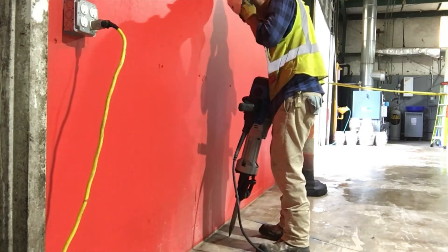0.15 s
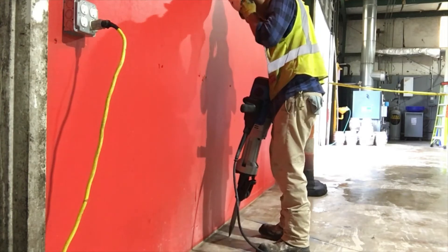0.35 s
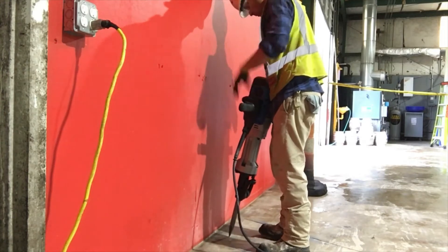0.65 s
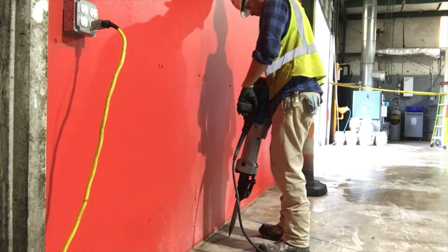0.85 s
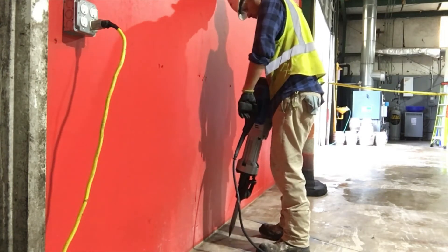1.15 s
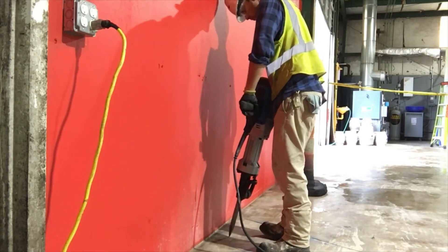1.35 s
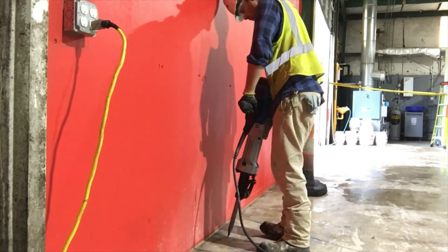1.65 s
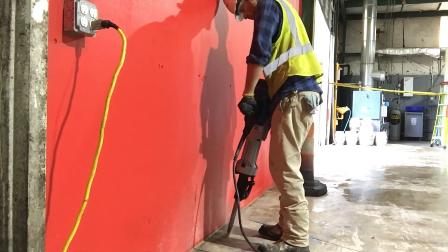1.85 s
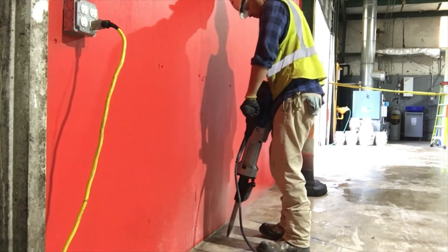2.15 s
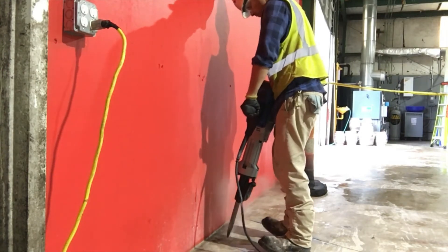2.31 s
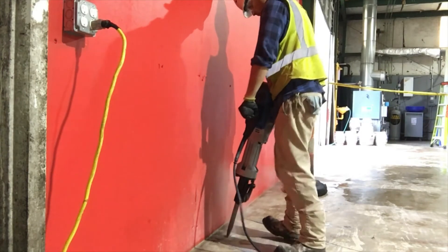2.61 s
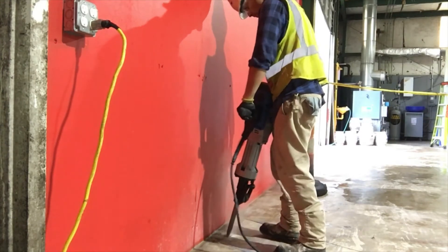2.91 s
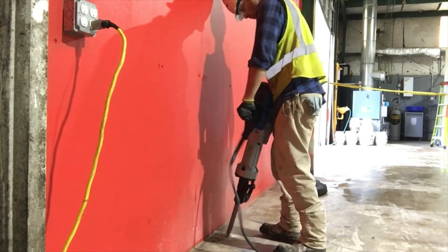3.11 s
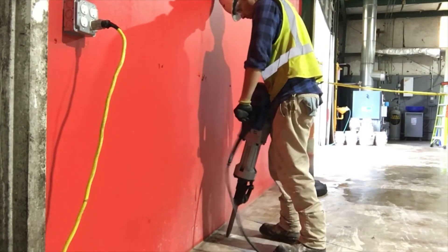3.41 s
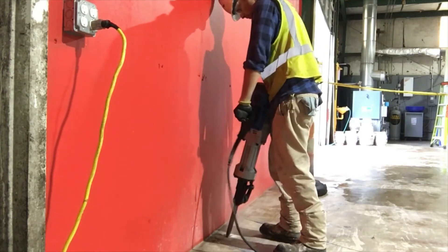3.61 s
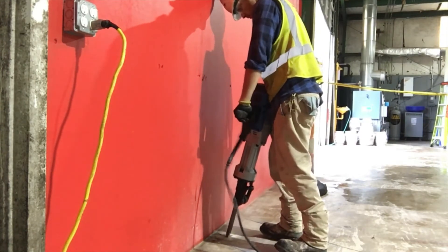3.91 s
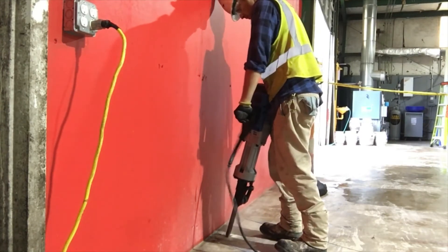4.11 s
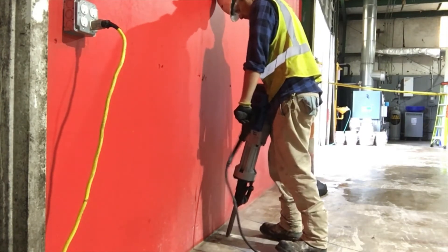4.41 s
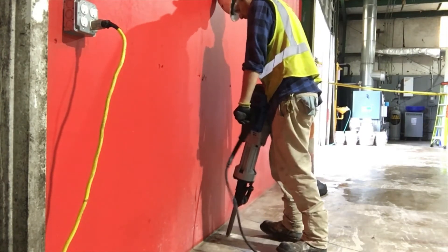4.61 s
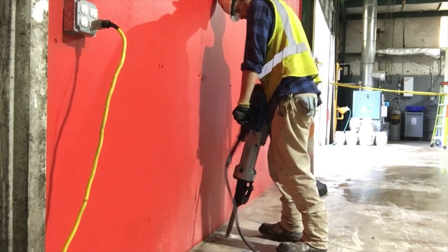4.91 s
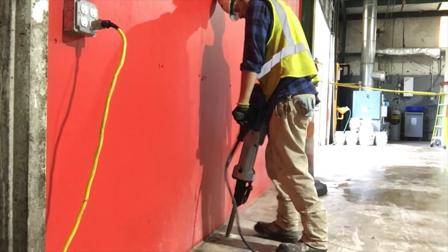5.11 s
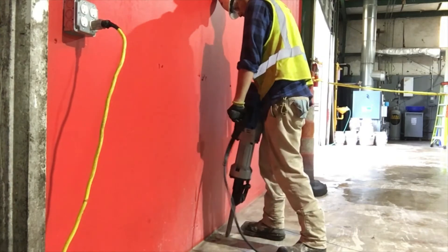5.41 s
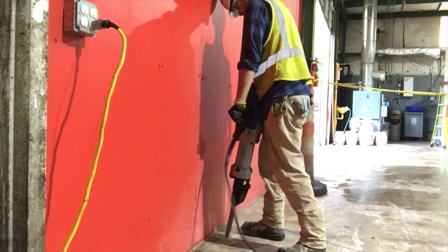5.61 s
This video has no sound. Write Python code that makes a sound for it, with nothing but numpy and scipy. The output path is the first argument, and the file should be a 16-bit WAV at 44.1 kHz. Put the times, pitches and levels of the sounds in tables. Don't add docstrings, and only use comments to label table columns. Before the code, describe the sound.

After a quiet ventilation drone, a motor whirs up and a steel chisel hammers concrete in loud, sharp, ringing blows about fifteen a second.

```python
import sys
import numpy as np
from scipy import signal
from scipy.fft import rfft, irfft, next_fast_len
from scipy.io import wavfile
from scipy.ndimage import uniform_filter1d, map_coordinates

SR = 44100
rng = np.random.default_rng(int(sys.argv[2]) if len(sys.argv) > 2 else 0)


def makeup_ratio(level_db):
    decades = np.asarray(level_db, float) / 20
    return 10 ** decades


def file_out(sig):
    cols = np.atleast_2d(sig).T
    lim = np.clip(cols, -1, 1)
    pcm = np.round(lim * 32767).astype(np.int16)
    wavfile.write(sys.argv[1], SR, pcm)


N = 253575

# delay [ms], pitch [Hz], half length [ms], level [dB]
STROKE = [
    (-1.6, 410, 1.8, 0),
    (1.4, 200, 2.2, -9),
    (-4.2, 1900, .6, -9),
    (-3.2, 800, .9, -8),
    (.45, 1250, .6, -6),
    (5.4, 1220, 1.2, -9),
    (7.3, 850, 2, -12),
    (21.5, 2000, .6, -9),
    (26.1, 1900, .6, -10),
]
# pitch [Hz], level [dB], t60 [s]
HOUSING = [(144.7, -22.5, 0.36), (208.8, -9.5, 0.073), (280, -40, 0.016), (581, -18, 0.1),
           (766.6, -6, 0.044), (851, -11, 0.055), (1067, -25, 0.035), (3235, -12.5, 0.068),
           (5580, -15, 0.024)]
# start [s], chisel ring [dB], free bounce [ms], twin against main ring [dB]
RINGING_BLOWS = [(1.6246, -11, 35, 0.5), (1.7128, -8.5, 39, -3), (1.7913, -11, 21, 0), (1.866, -11.5, 22.4, -5),
                 (1.9434, -8, 16, -2), (2.0139, -17.5, 22, 3.5), (2.088, -13, 41, -2), (2.1557, -7.5, 29, -18),
                 (2.2239, -18, 61, 5), (2.2923, -17, 65, 2), (2.3575, -18, 36, 6), (2.425, -10.5, 31, 2.5),
                 (2.4909, -19.5, 36, 3), (2.5585, -22.5, 34, 0), (2.6242, -23, 16.4, 2), (2.6899, -24.5, 30, 6.5),
                 (2.755, -20.5, 28, 3.5), (2.8189, -14, 19.4, -1), (2.884, -19.5, 40, -1), (2.9505, -26, 25, 1),
                 (3.0152, -17.5, 31, -3), (3.0812, -12, 26, -3.5), (3.1464, -18, 31, -1.5), (3.2114, -26, 19, -8),
                 (3.2776, -18, 34, -3), (3.342, -10, 28.5, -30), (3.4061, -26, 58, -18), (3.474, -18, 18, -8),
                 (3.538, -18.5, 30, -7), (3.6009, -14.5, 29, -10),
                 (3.665, -36, 22, -7), (3.729, -16.5, 28, -12), (3.7925, -26, 44, 2.5), (3.858, -20, 28, -9),
          (3.9212, -11.5, 34, -8), (3.9856, -16, 30, -3), (4.1157, -19, 27, 3), (4.18, -17.5, 29, -22),
          (4.2441, -24, 29, -2), (4.3083, -28, 10, -2), (4.3723, -26.5, 26, 2), (4.4996, -20.5, 22, 2),
          (4.5627, -23.5, 29, -8), (4.689, -13, 21.5, -15), (4.7534, -26, 44, -6), (4.8182, -20.5, 23, -2),
          (4.8823, -29, 50, -3), (4.9473, -24.5, 22, 1), (5.0105, -23, 25, -7), (5.0742, -22.5, 30, 2),
          (5.1371, -29, 42, 2), (5.203, -21, 26, 0.5), (5.2666, -16, 26, -5), (5.33, -22.5, 31, -1),
          (5.396, -13, 26.5, 2), (5.5236, -14, 30, -9), (5.5886, -17.5, 35, -7), (5.72, -25, 32, 0)]
DEAD_S = [4.0499, 4.4362, 4.6265, 5.4581, 5.653]
DEAD_RING = (-43, 47, -2)
GLANCING_S, GLANCING_DB = [2.088, 2.5585, 3.729, 5.0742], -6.5
# pitch [Hz], level [dB]
CRACK_COLOUR = [(300, -28), (1200, -6), (2000, -11.5), (3300, 2), (4200, -3.5), (5200, -1.5), (6200, -6.5),
                (7500, -1.5), (10000, -22.5), (14000, -8), (16000, -26)]
# pitch [Hz], level [dB], share of the gain swing
PINGS = [(1443, -30, 0.37), (2020, -15.5, 1.5), (3210, -34, .4), (1400, -27.5, 0.82)]
# start [s], pitch [Hz], level [dB]
LOUD_PINGS = [(1.6246, 1440, -20), (1.7913, 2095, -14.5), (1.866, 2100, -19), (1.9434, 2040, -17.5),
              (2.2923, 1450, -14.5), (2.5585, 3080, -21.5), (3.7925, 5560, -35), (4.2441, 3790, -19),
              (4.6263, 3560, -11.5), (5.203, 1395, -18), (5.2666, 1980, -17)]
# pitch [Hz], level [dB]
CHISEL = [
    [(7046, -1.5), (7120, -11.5), (7200, -17), (7270, -18)],
    [(6780, -4.5), (6835, -7.5)],
    [(4445, 1), (4640, 0.5)],
    [(9300, -3), (9610, -5.5), (12100, -7.5), (12400, -37)],
    [(13785, -1), (15300, -14), (15600, -19)],
]
# start [s], level [dB]
SQUARE = [(1.6246, 0.5), (1.7128, -4), (2.088, 2), (2.2239, -2), (2.755, 3), (2.6242, 4), (2.6899, 7),
          (3.0812, 6), (3.9212, 6), (3.9856, 3.5), (4.689, 9), (5.396, 7), (3.342, 0.5), (4.1157, 6),
          (2.8189, -0.5), (3.0152, -6), (3.474, -12), (3.538, -4), (3.6009, -0.5), (5.2666, -1),
          (5.5886, -15)]
# start [s], level [dB]
MUFFLE = [
    (2.75, -10),
    (2.82, -14.5),
    (5.7, -17.5),
]
CHOKED_S, CHOKED_DB = [1.6246, 1.866, 2.425, 2.5585, 2.6242], -7.5
# start [s], tooth rate [Hz]
GEARS = [
    (1.458, 602),
    (1.55, 986),
    (1.61, 1332),
    (1.7, 1490),
    (2.0, 1746),
    (2.2, 1900),
    (3.2, 1935),
    (5.75, 1922),
]
# pitch [Hz], level [dB]
TEETH = [(900, -12), (1500, -9), (1950, -3), (2900, 3), (3900, -2), (5800, -1), (8000, -20)]
# start [s], level [dB]
START = [
    (1.455, -31),
    (1.463, -17),
    (1.595, -18),
    (1.605, -12),
    (1.683, -33),
    (1.703, -24),
    (1.72, -26),
]
# pitch [Hz], width [Hz], level [dB]
GEARBOX = [(670, 51, 0), (1300, 200, -2.5), (1900, 310, 2), (2604, 76, 6.5), (2990, 91, 0),
           (4000, 640, -3.5), (5470, 1900, -13)]
# pitch [Hz], level [dB]
RUSH = [(60, -46), (150, -7.5), (600, -6.5), (1200, -1.5), (1950, -3.5), (2430, -4), (5780, -12),
        (6300, -26), (7020, -0.5), (8900, -29), (14000, -73), (16000, -28)]
# pitch [Hz], level [dB per Hz]
HALL = [(30, -23), (50, -17), (65, -3.5), (127, -14), (357, -13), (499, -17), (718, -15), (1030, -21),
        (1530, -19), (4940, -23.5), (6180, -19.5), (7950, -29.5), (11400, -32.5), (16000, -38.5)]
# pitch [Hz], width [Hz], level [dB]
HUM = [(57, 7.3, -11.5), (103.4, 13, -31), (235.4, 37, -15), (658, 6.7, -13)]
# pitch [Hz], t60 [s]
REVERB = [(100, 0.34), (1000, 0.36), (5000, 2), (15000, 2.7)]
# start [s], level [dB]
GAIN = [(1.5, -3.5), (1.8, -7.5), (2.3, -9.5), (3, -9), (3.6, -5.5), (4.2, -3), (4.6, -0.5), (5.3, -0.15),
        (5.75, -1)]
STARVED = [1.470, 1.752, 2.429, 2.562, 2.736, 3.437, 3.737, 4.201, 4.908, 5.079, 5.165]
# pitch [Hz], level under the loudest partial [dB]
MASK = [(7900, -120), (8100, -41), (8950, -41), (9200, -58), (10500, -49), (11200, -58), (14100, -58),
        (14500, -47)]

THUMP_DB, THUMP_FOLLOWS = -7.5, 0.59
GLANCING_THUMP_DB, REBOUND_GROWS_DB_PER_S = -2.5, 1.44
CRACK_DB, CRACK_FRESH_DB, CRACK_SETTLE_S, CRACK_SCATTER_DB = -9.5, 8.5, 0.21, 1.9
SNAP = 0.48
LANDING_DB, LANDING_T60_S = -14, 0.0081
CHATTER_DB, CHATTER_HZ = -34, 7000
PING_SCATTER_DB = 3.5
FAMILY_DB, FAMILY_LAG, FAMILY_SCATTER_DB, TYPICAL_RING_DB = [-16, -20, -17], [0.35, 0.15, 0.18], 2.5, -19
MUFFLE_SCATTER_DB = 2.5
SIDE_CHOKE = 1.4
SWITCH_S, SPIN_UP_END_S = 1.458, 1.73
WHINE_DB, WHINE_FOLLOWS, SPIN_UP_DB = -23, 0.97, 9
SPIN_UP_DULL_DB = -5
RUSH_DB, RUSH_FOLLOWS, RUSH_RISE_S = -22.5, 1.12, 0.26
HALL_DB, HALL_FOLLOWS = -35.5, 1.04
FAN_HZ, FAN_DB = 65.1, -3
TOP_HZ = 15900


def thump():
    track = np.zeros(N)
    t = np.arange(SR // 10) / SR
    u = t - .007
    times, *_, gain_db = blows()
    thump_db = THUMP_DB + THUMP_FOLLOWS * gain_db + 1.2 * rng.standard_normal(len(times))
    thump_db[nearest(GLANCING_S[1:])] += GLANCING_THUMP_DB
    for s, db in zip(times, thump_db):
        swings = 0
        for ms, hz, half_ms, level in STROKE:
            v = u - ms / 1000
            swing_db = level + rng.normal(0, 1)
            if 4 < ms < 10:
                swing_db += REBOUND_GROWS_DB_PER_S * (s - 3.5)
            swings = swings + makeup_ratio(swing_db) * np.exp(-(1000 * v / half_ms) ** 2) * -np.cos(2 * np.pi * hz * v)
        ring = 0
        for hz, level, t60 in HOUSING:
            ring = ring + makeup_ratio(level + rng.normal(0, 1.85) - 60 * abs(u) / t60) * np.sin(2 * np.pi * hz * u)
        add(track, s - .007, makeup_ratio(db) * (swings - (u > 0) * ring))
    return filtered(track, lambda hz: (1j * hz / (90 + 1j * hz)) ** 2)


def crack():
    burst, pings, chatter = np.zeros(N), np.zeros(N), np.zeros(N)
    t = np.arange(SR // 16) / SR
    rise = 1 - np.exp(-(t / 0.0019) ** 2)
    times, _, bounces, _, gain_db = blows()
    luck = rng.standard_normal((len(times), 3))
    fresh_db = CRACK_FRESH_DB * np.exp((times[0] - times) / CRACK_SETTLE_S)
    crack_db = CRACK_DB + fresh_db + CRACK_SCATTER_DB * luck[:, 0]
    crack_db[nearest(GLANCING_S)] += GLANCING_DB

    base_hz, base_db, follows = np.array(PINGS)[rng.integers(len(PINGS), size=len(times))].T
    part_hz = base_hz * (1 + .03 * luck[:, 1])
    part_db = base_db + follows * gain_db + PING_SCATTER_DB * luck[:, 2]
    loud_s, loud_hz, loud_db = np.transpose(LOUD_PINGS)
    part_hz[nearest(loud_s)] = loud_hz
    part_db[nearest(loud_s)] = loud_db

    for s, db, bounce_ms, hz, ping_db in zip(times, crack_db, bounces, part_hz, part_db):
        free_s = bounce_ms / 1000
        decay = SNAP * makeup_ratio(-60 * abs(t - .002) / 0.0054) + makeup_ratio(-60 * t / 0.023) + 0.16 * makeup_ratio(-60 * t / 0.12)
        add(burst, s - .001, makeup_ratio(db + 7.5) * decay * rng.standard_normal(len(t)) * rise)
        tick_db = db + 4.5 + LANDING_DB + rng.normal(0, 3)
        tick = makeup_ratio(tick_db - 60 * t / LANDING_T60_S) * rng.standard_normal(len(t))
        add(burst, min(s + free_s, N / SR), tick * rise)
        grit_size = makeup_ratio(db + CHATTER_DB + rng.normal(0, 6))
        add(chatter, s, grit_size * (t < free_s) * rng.standard_normal(len(t)))
        add(pings, s, makeup_ratio(ping_db + 5.5 - 60 * t / 0.049) * np.sin(2 * np.pi * hz * t) * rise)
    coloured = filtered(burst, lambda hz: makeup_ratio(along(CRACK_COLOUR, hz)))
    bright = filtered(chatter, lambda hz: (1j * hz / (CHATTER_HZ + 1j * hz)) ** 2)
    return coloured + pings + bright


def chisel():
    track = np.zeros(N)
    t = np.arange(SR // 10) / SR
    times = blows()[0]
    choke = np.interp(times, *np.transpose(MUFFLE))
    choke[nearest(CHOKED_S)] += CHOKED_DB
    side = np.zeros(len(times))
    square_s, square_db = np.transpose(SQUARE)
    side[nearest(square_s)] = square_db
    for s, db, bounce_ms, twin_db, _, side_db, choke_db in zip(*blows(), side, choke):
        luck = rng.standard_normal(4)
        muffle_db = choke_db + MUFFLE_SCATTER_DB * luck[0]
        lag_db = np.multiply(FAMILY_LAG, db - TYPICAL_RING_DB)
        sides_db = side_db + np.array(FAMILY_DB) - lag_db + FAMILY_SCATTER_DB * luck[1:]
        landed = 1 / (1 + np.exp(-(t - bounce_ms / 1000) / 0.00025))
        fade_db = -60 * t / .5 - 60 * np.maximum(t - .055, 0) / 0.14
        shape = makeup_ratio(db + 5.0 + fade_db + muffle_db * landed) * (1 - np.exp(-t / 0.0027))
        for modes, share_db in zip(CHISEL, (0, twin_db, *sides_db)):
            for k, (hz, level) in enumerate(modes):
                spread = rng.standard_normal(3)
                lesser = min(k, 1)
                waver = np.interp(t, np.linspace(0, t[-1], num=13), rng.standard_normal(size=13))
                slip = (.5 + .6 * lesser) * waver * (1 + abs(np.log(hz / 7000)))
                strength = makeup_ratio(lesser * 4.5 * spread[2] + (1.5 + 2 * lesser) * waver[::-1])
                tone = np.sin(2 * np.pi * hz * (1 + 0.0011 * spread[0]) * t + 3 * spread[1] + slip)
                extra_db = (abs(hz - 7000) > 1000) * (SIDE_CHOKE - 1) * muffle_db * landed
                add(track, s, shape * makeup_ratio(share_db + level + extra_db) * strength * tone)
    return track


def motor():
    until, since = crank()
    tooth_hz = curves(GEARS)[0]
    gain_db = curves(GAIN)[0]
    running = np.arange(N) / SR - SWITCH_S
    spinning_up = running < SPIN_UP_END_S - SWITCH_S

    load = makeup_ratio(2.5 * wobble(15)) * np.exp(-((until - .012 - .002 * wobble(15)) / .0055) ** 2)
    sag = (.034 + .01 * wobble(15) - .018 * spinning_up) * np.tanh((until - .012) / 0.0054)
    turn = 2 * np.pi * np.cumsum(tooth_hz * (1 + sag + .015 * wobble(70))) / SR
    whine = 0
    for k in range(1, 5):
        share = makeup_ratio(along(TEETH, k * tooth_hz) + 2.5 * wobble(120)) * (load + .7 / k ** 2)
        whine = whine + share * makeup_ratio(spinning_up * SPIN_UP_DULL_DB * abs(k - 2)) * np.sin(k * turn)
    whine_db = WHINE_DB + np.where(spinning_up, SPIN_UP_DB, WHINE_FOLLOWS * gain_db)

    rush_size = makeup_ratio(RUSH_DB + RUSH_FOLLOWS * gain_db) * np.clip(running / RUSH_RISE_S, 0, 1)
    flare = 1 + .8 * np.exp(-since / .012)
    rush = rush_size * makeup_ratio(-1 + 1.94 * wobble(40) + 0.67 * wobble(7.3)) * flare * noise(RUSH)

    knocks = rng.standard_normal(N) * makeup_ratio(3.1 * wobble(400))
    clatter_db = curves(START + [(1.76, -45)], before=-120)[0] - 2.5
    clatter = makeup_ratio(clatter_db) * unit(filtered(knocks, resonant(GEARBOX)))
    t = np.arange(SR // 20) / SR
    clack = makeup_ratio(-13 - 60 * t / 0.078) * np.sin(2 * np.pi * 1450 * t) * (1 - np.exp(-t / .0015))
    add(clatter, 1.461, clack)
    return (running > 0) * makeup_ratio(whine_db) * whine + rush + clatter


def crank():
    t = np.arange(N) / SR
    hits = np.r_[-1, 1.563, blows()[0], 5.785]
    after = np.searchsorted(hits, t)
    return hits[after] - t, t - hits[after - 1]


def blows():
    rows = np.array(sorted(RINGING_BLOWS + [(s, *DEAD_RING) for s in DEAD_S]))
    return (*rows.T, np.interp(rows[:, 0], *np.transpose(GAIN)))


def nearest(times):
    return abs(blows()[0][:, None] - times).argmin(axis=0)


def reverb(x):
    hz, t, z = signal.stft(rng.standard_normal(SR), SR, nperseg=256)
    tail = signal.istft(z * makeup_ratio(-60 * t / along(REVERB, hz)[:, None]), SR, nperseg=256)[1]
    return signal.fftconvolve(np.pad(x, (700, 0)), tail / np.linalg.norm(tail))[:N]


def hall():
    hum = unit(filtered(rng.standard_normal(N), resonant(HUM)))
    fan_turn = 2 * np.pi * np.cumsum(FAN_HZ + 3 * wobble(5)) / SR
    drone = makeup_ratio(FAN_DB + 2.7 * wobble(4.9)) * np.sin(fan_turn)
    hiss = makeup_ratio(.4 * wobble(4)) * noise(HALL)
    size = makeup_ratio(HALL_DB + HALL_FOLLOWS * curves(GAIN)[0])
    return size * (makeup_ratio(10) * hiss + makeup_ratio(-1.0) * hum + drone)


def unit(x):
    return x / np.sqrt(np.mean(x ** 2) + 1e-20)


def along(points, hz):
    f, v = np.transpose(points)
    return np.interp(np.log(hz + 1), np.log(f + 1), v)


def curves(rows, before=None):
    s, *cols = np.transpose(rows)
    return [np.interp(np.arange(N) / SR, s, c, left=before) for c in cols]


def wobble(rate):
    knots = rng.standard_normal(int(N * rate / SR) + 4)
    return map_coordinates(knots, [np.arange(N) * rate / SR])


def filtered(x, response):
    m = next_fast_len(N + SR // 2)
    return irfft(rfft(x, m) * response(np.fft.rfftfreq(m, 1 / SR)), m)[:N]


def resonant(peaks):
    def response(f):
        total = 0
        for k, (c, w, db) in enumerate(peaks):
            total = total + (-1) ** k * makeup_ratio(db) * 1j * f * w / (c * c - f * f + 1j * f * w)
        return total
    return response


def noise(spectrum):
    return unit(filtered(rng.standard_normal(N), lambda hz: makeup_ratio(along(spectrum, hz))))


def add(track, s, sound):
    part = track[round(s * SR):][:len(sound)]
    part += sound[:len(part)]


def masked(x):
    hz, _, z = signal.stft(x, SR, nperseg=1024)
    level = uniform_filter1d(abs(z), size=12, axis=0)
    keep = level > makeup_ratio(along(MASK, hz))[:, None] * abs(z).max(axis=0)
    return signal.istft(z * keep, SR, nperseg=1024)[1][:N]


def starve(x, keep_db, rise, fall, depth):
    out = x.copy()
    t = np.arange(2048) / SR - .012
    window = np.hanning(len(t)) ** .5
    share = depth * np.clip(t / rise, 0, 1) * np.clip((fall + 0.009 - t) / fall, 0, 1)
    for s in STARVED:
        start = round((s - .012) * SR)
        at = slice(start, start + len(t))
        z = rfft(x[at] * window)
        strength = uniform_filter1d(abs(z), size=5)
        around = np.maximum(uniform_filter1d(abs(z), size=120), .45 * np.median(abs(z[:300])))
        kept = irfft(z * (strength > makeup_ratio(keep_db) * around), len(t))
        out[at] = (1 - share) * x[at] + share * kept / (window + 0.019)
    return out


def scene():
    body, tip, steel = thump(), crack(), chisel()
    walls = makeup_ratio(-4) * reverb(filtered(body, lambda hz: 1j * hz / (500 + 1j * hz)))
    echoes = walls + makeup_ratio(-14.5) * reverb(tip) + makeup_ratio(-20.5) * reverb(steel)
    return (body + tip + steel + motor() + echoes + hall())[None]


def band_limit(x):
    return signal.sosfilt(signal.butter(12, 16670, fs=SR, output="sos"), x)


def record(dry):
    squashed = dry / (1 + np.abs(dry / .9) ** 6) ** (1 / 6)
    trimmed = filtered(squashed[0], lambda hz: 1 / (1 + (hz / TOP_HZ) ** 60))
    mix = starve(masked(trimmed), keep_db=3.5, rise=0.004, fall=0.014, depth=.85)[None]
    return band_limit(mix)


dry = scene()
out = record(dry)
file_out(out)
```